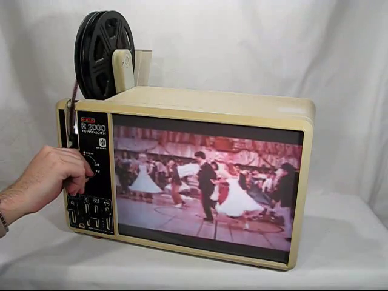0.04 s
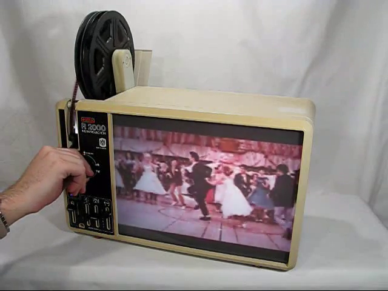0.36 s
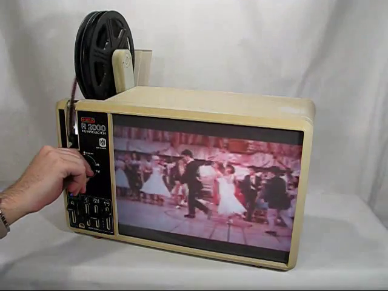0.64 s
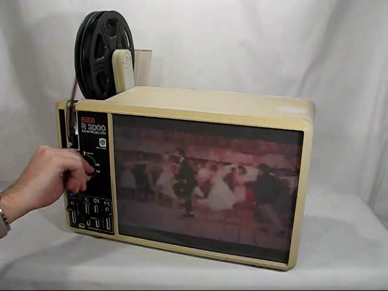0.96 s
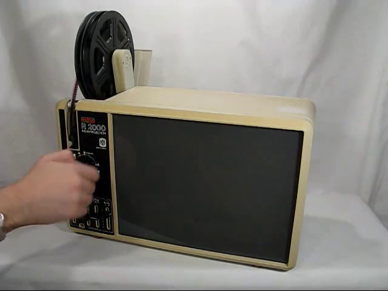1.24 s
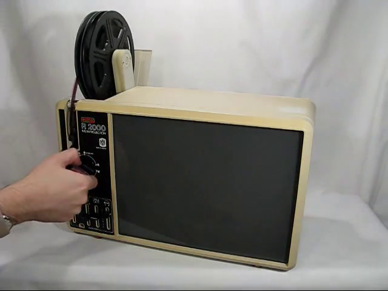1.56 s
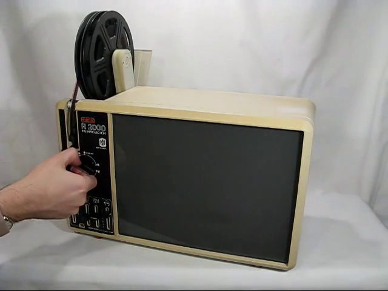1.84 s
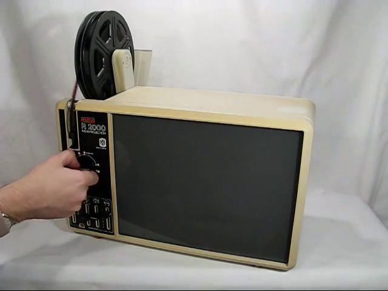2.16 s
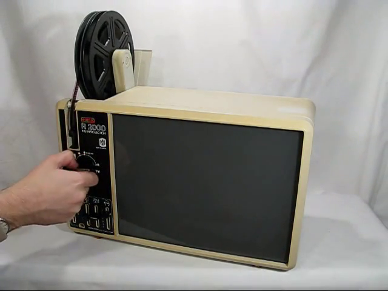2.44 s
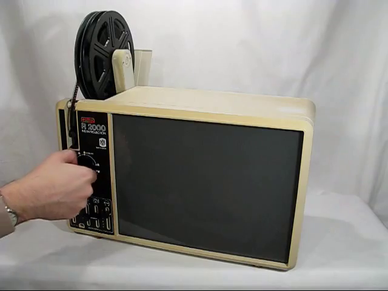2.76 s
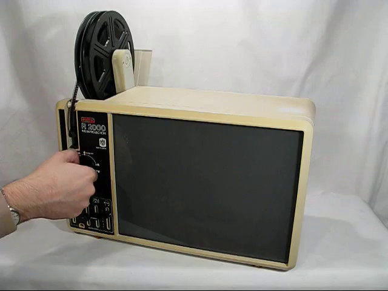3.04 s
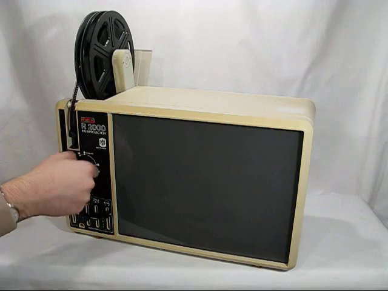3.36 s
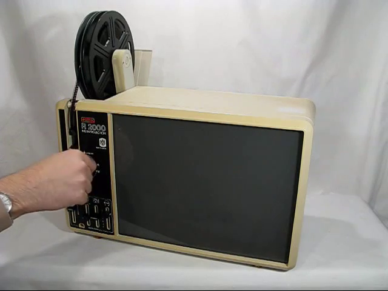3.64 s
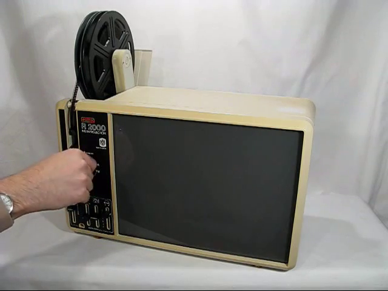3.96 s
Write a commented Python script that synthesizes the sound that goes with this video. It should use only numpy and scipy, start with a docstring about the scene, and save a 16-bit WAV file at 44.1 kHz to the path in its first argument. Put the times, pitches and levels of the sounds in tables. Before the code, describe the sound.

A film projector clatters rapidly, then knob clicks switch it off and it winds down.

```python
"""A film projector runs in a small room: once a frame the film scrapes through the gate and the claw
clacks, over the drone of the gear train and the motor's hum. At 1 s a hand snaps the control knob to put
the lamp out; at 2.2 s a second snap stops the drive. Both duck the recorder's gain.
The mechanism coasts to rest with a few ticks and a soft whirr comes up.
Near 3.5 s the knob clicks twice more, and the hollow case answers each click."""
import sys
import numpy as np
from scipy import signal
from scipy.fft import rfft, irfft
from scipy.io import wavfile
from scipy.ndimage import uniform_filter1d

SR = 44100
rng = np.random.default_rng(int(sys.argv[2]) if len(sys.argv) > 2 else 0)


def wav_record(signal):
    """Record a signal, one row per channel, as 16-bit PCM in the file named by sys.argv[1]."""
    frames = np.transpose(np.atleast_2d(signal))
    bounded = np.clip(frames, -1, 1)
    # unit amplitude maps onto the largest positive 16-bit level
    quanta = np.round(bounded * 32767).astype(np.int16)
    wavfile.write(sys.argv[1], SR, quanta)


N = 176400
T = np.arange(N) / SR
FRAMES_PER_S, FIRST_CLACK_S, STOP_S = 17.52, .022, 2.17


def from_db(db):
    """Decibels to gain."""
    return 10 ** (np.asarray(db) / 20)


def rms_one(x):
    """Scale to unit rms."""
    return x / np.sqrt(np.mean(x ** 2) + 1e-20)


def at_hz(points, hz):
    """Read a spectrum on a log-frequency axis."""
    f, db = np.transpose(points)
    return np.interp(np.log(np.maximum(hz, 1)), np.log(f), db)


def noise(spectrum):
    """Coloured noise of unit rms."""
    eq = from_db(at_hz(spectrum, np.arange(N // 2 + 1) * SR / N))
    return rms_one(irfft(rfft(rng.standard_normal(N)) * eq, N))


def drift(rate):
    """A random wobble of unit rms, changing `rate` times a second."""
    return rms_one(np.interp(T * rate, np.arange(4000), rng.standard_normal(4000)))


def burst(start, decay):
    """Envelope of a contact: instant attack, exponential decay."""
    return (T >= start) * np.exp(-np.clip((T - start) / decay, 0, 50))


def shaped(sound, envelope):
    """Noise under an envelope, with exactly the envelope's energy."""
    return rms_one(sound * envelope) * np.sqrt(np.mean(envelope ** 2))


def ring(clicks, hz, t60):
    """A unit click sets a sine of height 1 ringing."""
    r, w = from_db(-60 / (t60 * SR)), 2 * np.pi * hz / SR
    return signal.lfilter([0, np.sin(w)], [1, -2 * r * np.cos(w), r * r], clicks + 1e-18)


PREDELAY_S = .0044
def room(x, wet_db, split_hz=2430):
    """Add a small room's diffuse tail, whose treble dies a little sooner."""
    t, tail = T[:SR // 2], 0
    for band, t60 in ("low", .31), ("high", .29):
        crossover = signal.butter(2, split_hz, band, fs=SR, output="sos")
        tail += signal.sosfilt(crossover, rng.standard_normal(len(t))) * from_db(-60 * t / t60)
    tail *= t > PREDELAY_S
    return x + from_db(wet_db) * signal.fftconvolve(x, tail / np.sqrt(np.sum(tail ** 2)))[:N]


# Colour of the room tone. Each row: frequency in Hz, relative level in dB.
ROOM_TONE_EQ = [(30, -18), (50, -8), (85, -1), (150, -5), (700, -11), (2000, -6.5), (8000, -13),
                (16000, -52)]
def room_tone():
    """A faint, steady bed of rumble and hiss."""
    return from_db(-57.5) * noise(ROOM_TONE_EQ)


# Colour of the whirr, with the recorder's treble notch and thin digital hiss above it.
# Each row: frequency in Hz, relative level in dB.
WHIRR_EQ = [(45, 1), (90, -10.5), (160, -8), (300, -7.5), (550, -5.5), (780, 0.5), (1300, 2.5),
            (1700, -3.5), (2300, -13), (4200, -14.5), (8200, -23.5), (9750, -15), (11000, -36),
            (12400, -15), (13500, -25), (16000, -22)]
# Its fader moves. Each row: time in seconds, level in dB.
WHIRR_FADER = [(2.2, -51), (2.58, -54.5), (2.7, -51.5), (2.85, -46), (3.3, -46), (3.75, -44.5), (3.87, -48),
               (4, -45)]
def whirr(flutter_db=2):
    """A soft, fluttering, fan-like whirr that comes up once the claw has stopped."""
    return noise(WHIRR_EQ) * from_db(np.interp(T, *np.transpose(WHIRR_FADER)) + flutter_db * drift(90))


def tone(hz, waver):
    """A sine whose level and phase waver."""
    phase = 2 * np.pi * (hz * T + rng.random())
    return np.sqrt(2) * (1 + waver * drift(12)) * np.sin(phase + waver * drift(12))


# The motor's tones. Each row: pitch in Hz, level in dB, depth of waver.
MOTOR_TONES = [(100.2, -40, 0.086), (237.4, -43.5, 0.45), (53, -68.5, .1)]
def motor(release_s=.02):
    """Mains hum and rotor tone, gone as soon as the current is cut."""
    hum = sum(from_db(db) * tone(hz, waver) for hz, db, waver in MOTOR_TONES)
    return hum * np.exp(-np.maximum(T - STOP_S, 0) / release_s)


# The gears' strong harmonics, as multiples of the frame rate, then their levels in dB.
GEAR_HARMONICS = [8, 9, 16, 17, 18, 19, 20, 21, 23, 25, 31, 35, 44]
GEAR_HARMONIC_DB = [-43.5, -42.5, -43, -39.5, -50.5, -44.5, -44, -47.5, -56, -43, -48.5, -39, -41.5]
# The bed of weaker harmonics. Each row: frequency in Hz, level per harmonic in dB.
GEAR_BED = [(105, -56), (190, -63.5), (260, -57.5), (450, -49.5), (520, -50.5), (640, -50.5), (800, -52.5),
            (880, -51.5), (1100, -55), (1400, -66)]
# Colour of the loose rattle. Each row: frequency in Hz, relative level in dB.
RATTLE_EQ = [(40, -39), (150, -5), (250, -1), (430, 0), (530, -4), (630, -2), (770, 1.5), (880, -11),
             (1100, -7), (2100, -9), (4000, -16), (7000, -21), (9500, -21), (16000, -23.5)]
def gears():
    """The gear train drones and rattles, most just after each clack, and fades once switched off."""
    strong, drone = dict(zip(GEAR_HARMONICS, GEAR_HARMONIC_DB)), 0
    for k in range(6, 80):
        hz = k * FRAMES_PER_S
        drone += from_db(strong.get(k, at_hz(GEAR_BED, hz))) * tone(hz, waver=min(.21 * k / 25, .7))
    rattle = noise(RATTLE_EQ) * from_db(-31.5 + 2 * drift(300))
    pulse_db = 1.22 * np.cos(2 * np.pi * FRAMES_PER_S * (T - FIRST_CLACK_S - .0086))
    coast_db = (T > STOP_S) * (-7.5 - 48 * (T - STOP_S))
    return from_db(coast_db + pulse_db) * (drone + rattle)


# Colour of the case's boom. Each row: frequency in Hz, relative level in dB.
BOOM_EQ = [(120, -25), (240, -13), (310, 3.5), (410, -2), (520, -12), (1000, -40)]
# The booms. Each row: start in seconds, level in dB.
BOOM_CUES = [(3.409, -34.5), (3.583, -30.5)]
def case_boom(decay_s=.047):
    """The air in the case answers the last two snaps with a low, hollow boom."""
    return noise(BOOM_EQ) * sum(from_db(db) * burst(s, decay_s) for s, db in BOOM_CUES)


# Snaps of the switch. Each row: start in seconds, crack level in dB, crack decay in seconds,
# clatter level in dB, knock level in dB.
SNAP_CUES = [(0.982, -24, 0.0045, -52, -55), (0.9869, 1, 0.0025, -11.5, -19.5),
             (2.1735, -26, 0.0035, -28, -35), (2.1787, -13, 0.0047, -35, -35),
             (3.4044, -19.5, 0.003, -27.5, -43), (3.5773, -17, .005, -30.5, -31),
             (3.584, -31.5, 0.0056, -20.5, -37.5)]
# Colours of the crack and the clatter. Each row: frequency in Hz, relative level in dB.
CRACK_EQ = [(200, -29), (700, -12.5), (1500, -3), (3000, 2), (4500, -7), (7500, -7), (10000, -17),
            (16000, -20.5)]
CLATTER_EQ = [(40, -10), (130, -20), (220, -14.5), (330, -5), (520, 1), (750, 1.5), (1000, -3), (1500, 0),
              (2200, -7), (6000, -20)]
# The cabinet's modes. Each row: pitch in Hz, gain in dB, time to fall 60 dB in seconds.
CABINET_MODES = [(48, -5, 0.072), (150.3, -9.5, 0.45), (279, -9, 0.36), (744, 5.5, .18), (1500, 0.5, 0.16),
                 (2570, -2, 0.053), (3080, 2.5, 0.032), (4430, 5, 0.048)]
def knob(tail_s=.039, clatter_s=.017):
    """Each snap is a bright crack with a diffuse tail, a clatter of the case and a ringing knock."""
    crack, clatter = noise(CRACK_EQ), noise(CLATTER_EQ)
    knocks, cracks, clatters = np.zeros((3, N))
    for start, crack_db, decay, clatter_db, knock_db in SNAP_CUES:
        knocks[int(start * SR)] = from_db(knock_db)
        tail = from_db(-5.5) * np.sqrt(decay / tail_s) * burst(start + PREDELAY_S, tail_s)
        cracks += from_db(crack_db) * shaped(crack, np.hypot(burst(start, decay), tail))
        clatters += from_db(clatter_db) * shaped(clatter, burst(start, clatter_s))
    cabinet = sum(from_db(db) * ring(knocks, hz, t60) for hz, db, t60 in CABINET_MODES)
    return cracks + room(clatters, wet_db=-3) + cabinet


# The claw's last ticks. Each row: start in seconds, level in dB.
TICK_CUES = [(2.327, -34.5), (2.4508, -36.5), (2.599, -51), (2.683, -54)]
def coasting_ticks(decay_s=.011):
    """The coasting claw ticks ever more softly, in the colour of the knob's crack."""
    return noise(CRACK_EQ) * sum(from_db(db) * burst(s, decay_s) for s, db in TICK_CUES)


# Colour of the film's scrape. Each row: frequency in Hz, relative level in dB.
SCRAPE_EQ = [(600, -6), (1500, 2), (2600, -3), (4000, -2), (6500, -6.5), (9000, -9), (16000, -19.5)]
def film_scrape(lead_s=.0062, width_s=.0079):
    """The film scrapes through the gate in a grainy swell just before each clack."""
    frames = (T - FIRST_CLACK_S + lead_s) * FRAMES_PER_S
    from_pull_s = ((frames + .5) % 1 - .5) / FRAMES_PER_S
    swell = np.exp(-.5 * (from_pull_s / width_s) ** 2) * (T < STOP_S)
    return noise(SCRAPE_EQ) * swell * from_db(-34 + 3.2 * drift(600))


# Contacts in one clack. Each row: offset in seconds, relative level in dB, grit decay in seconds.
CLAW_CONTACTS = [(-.004, -8, 0.0033), (0, 1.5, .003), (.0045, -1, 0.0024), (0.0111, -9, .005)]
# Frames that land harder or softer. Each row: time in seconds, boost or cut in dB.
CLAW_ACCENTS = [(.25, 1), (.31, 2.5), (.36, 1.5), (.59, 1), (.65, 2), (1.11, -2), (1.28, -4), (1.335, 2.5),
                (1.565, 1), (1.62, 4.5), (1.68, 1.5), (1.79, -2), (1.91, 1.5), (2.08, -1.5)]
# The clack's ringing pitches; the top rows are a thin digital sheen from the recorder.
# Each row: pitch in Hz, relative level in dB, time to fall 60 dB in seconds.
CLACK_RING = [(1112, -12, 0.027), (1414, -8, 0.021), (1540, -7.5, 0.023), (1823, -13, 0.025),
              (2450, -15.5, 0.023), (3170, -17.5, 0.017), (4300, -28, .005), (8400, -25.5, .015),
              (9500, -23.5, 0.029), (12550, -22.5, .018), (13500, -26, .015), (15200, -41, .005)]
def claw(jitter_s=.0005, spread_db=.96, grit_mix=.79):
    """Once a frame the claw lands in a quick run of gritty, ringing contacts."""
    starts = np.arange(FIRST_CLACK_S, STOP_S, 1 / FRAMES_PER_S)
    accent_db = sum(db * (abs(starts - s) < .5 / FRAMES_PER_S) for s, db in CLAW_ACCENTS)
    force = np.zeros(N)
    for offset, db, decay in CLAW_CONTACTS:
        timing, strength = rng.standard_normal((len(starts), 2)).T
        landings = ((starts + offset + jitter_s * timing) * SR).astype(int)
        hits = np.zeros(N)
        hits[landings] = from_db(db + accent_db + spread_db * strength)
        envelope = signal.lfilter([1], [1, -np.exp(-1 / (decay * SR))], hits + 1e-18)
        grit = envelope * rng.standard_normal(N) * np.sqrt(2 / (decay * SR))
        force += hits + grit_mix * grit
    rings = ((-1) ** k * from_db(db) * ring(force, hz, t60) for k, (hz, db, t60) in enumerate(CLACK_RING))
    return from_db(-17.5) * sum(rings)


def scene():
    """The projector over the room tone, in mono."""
    transport = room(claw() + film_scrape() + coasting_ticks(), wet_db=-6)
    return (transport + gears() + motor() + knob() + case_boom() + whirr() + room_tone())[None]


def record(dry, limit_db=-22.5, detect_s=.0078, recover_per_s=1.3, ceiling=.91, dc_offset=-.0069):
    """The gain ducks at once and creeps back; then soft clipping, a treble notch, a high cut and DC."""
    level = np.sqrt(np.maximum(uniform_filter1d(dry[0] ** 2, int(detect_s * SR)), 1e-12))
    wanted = np.minimum(1, from_db(limit_db) / level)
    gain = np.minimum.accumulate(wanted - recover_per_s * T) + recover_per_s * T
    rounded = ceiling * np.tanh(dry * gain / ceiling)
    notch = signal.butter(2, [10605, 11455], "bandstop", fs=SR, output="sos")
    high_cut = signal.ellip(10, .1, 80, 15900, fs=SR, output="sos")
    return signal.sosfilt(high_cut, signal.sosfilt(notch, rounded)) + dc_offset


dry = scene()
out = record(dry)
wav_record(out)
```